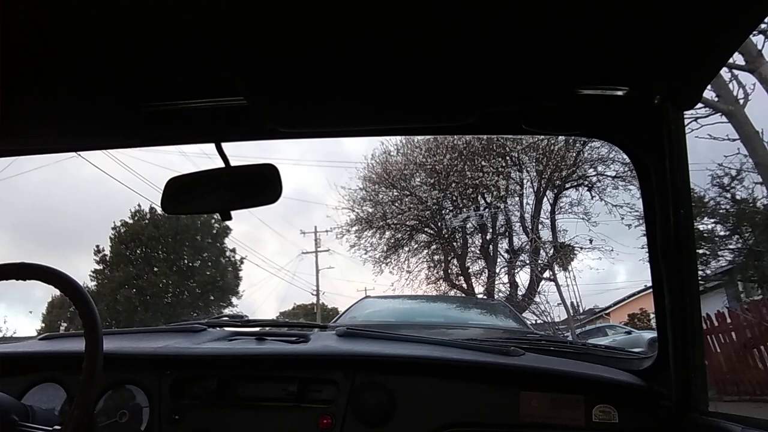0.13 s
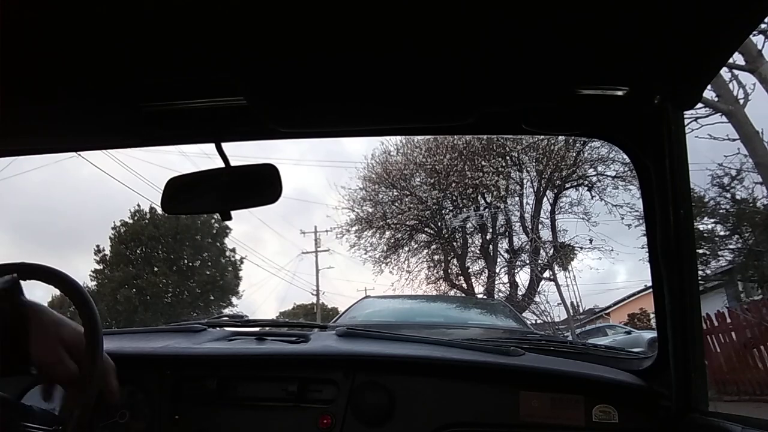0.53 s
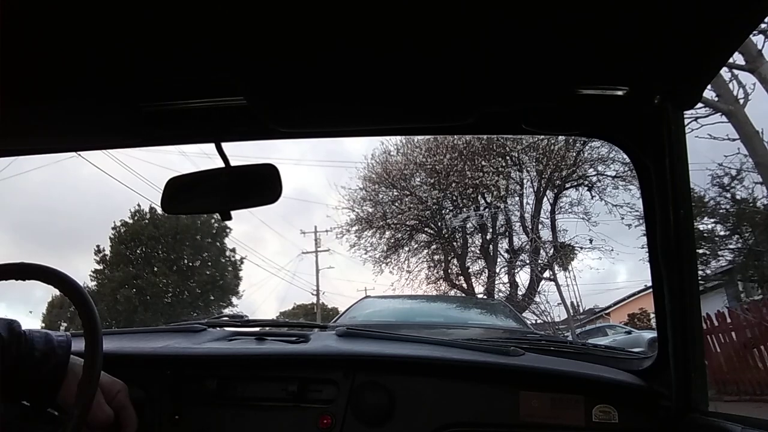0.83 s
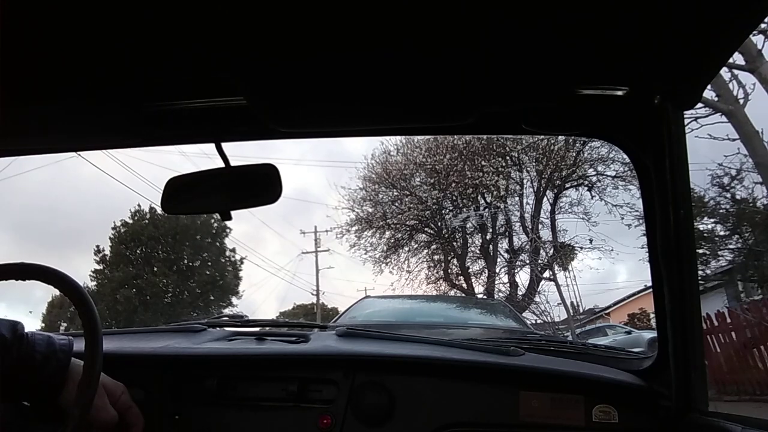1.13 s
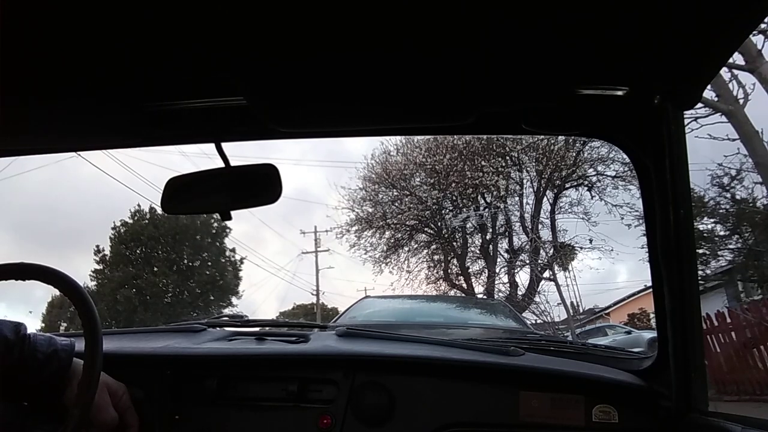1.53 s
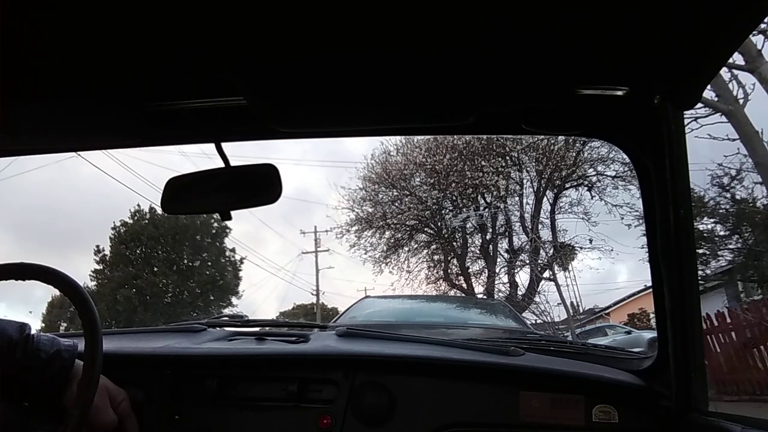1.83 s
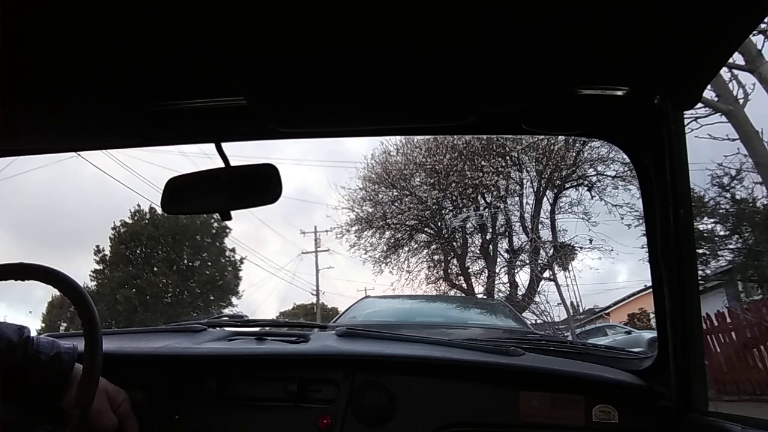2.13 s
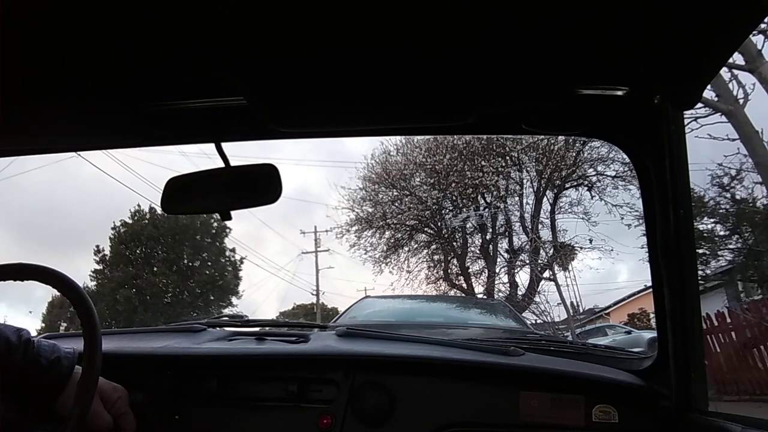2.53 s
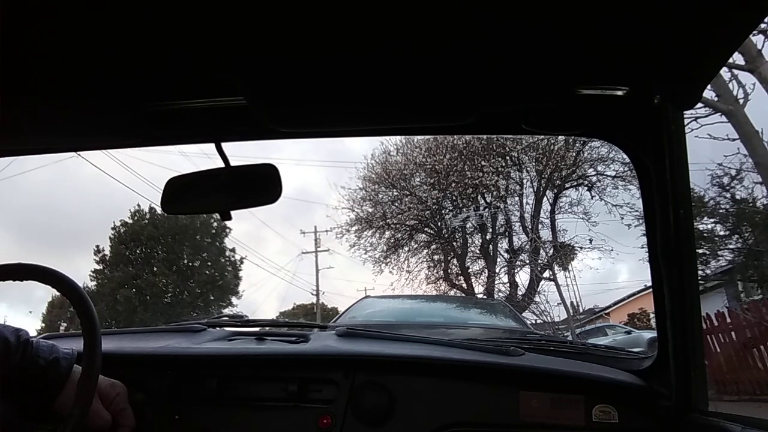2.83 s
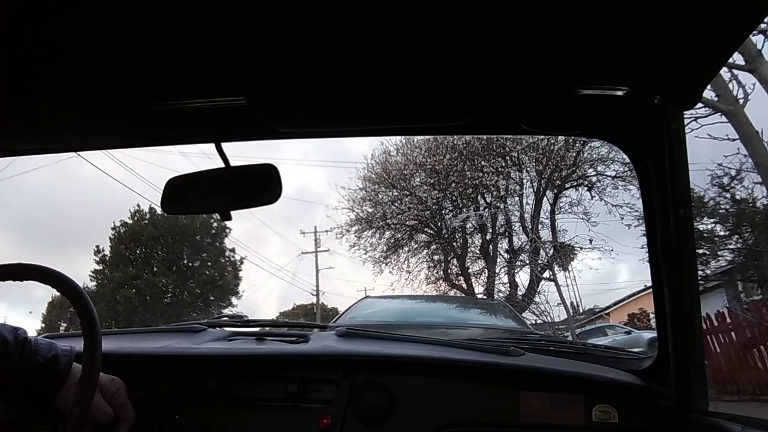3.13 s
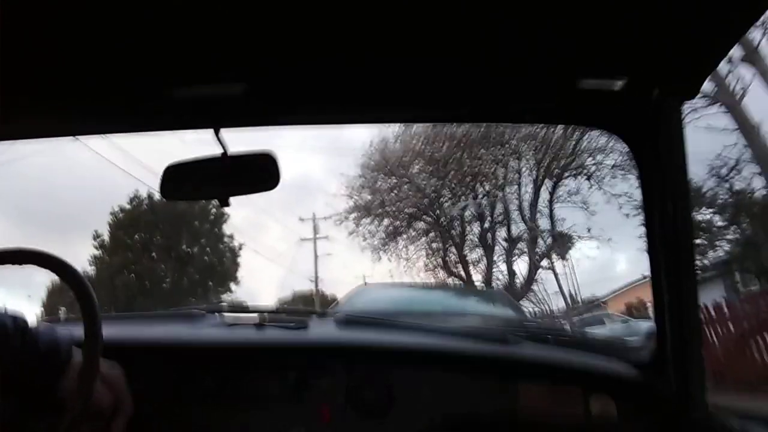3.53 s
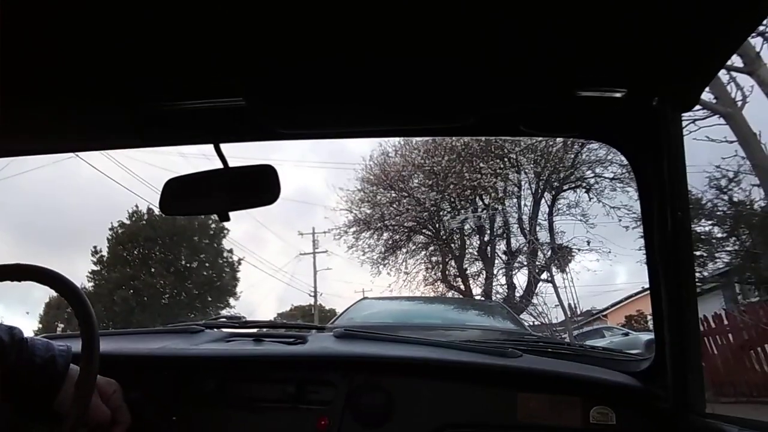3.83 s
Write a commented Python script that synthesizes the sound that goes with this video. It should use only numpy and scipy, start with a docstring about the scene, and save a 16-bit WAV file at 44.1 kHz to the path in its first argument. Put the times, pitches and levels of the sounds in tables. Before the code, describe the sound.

Starter and engine heard from within a small, dry cabin. Quiet hand rubbing and light metal clicks lead to a abrupt rough crank, then a softer muffled engine run with brighter key jingles near the microphone.

```python
"""Keys and engine start in a parked car

A hand fumbles with keys over a steady hush: noise rustles and crackles, noise bursts tick with a metal ring,
knocks on column and dash add a decaying sine. Then a starter grinds (uneven tooth pulses in housing
resonances), the engine catches and runs (firing pulses through the bulkhead) amid louder ticks and knocks,
and a struck key rings as decaying sines roughened by fast level flutter."""
import sys
import numpy as np
from scipy import signal
from scipy.fft import rfft, irfft
from scipy.io import wavfile
from scipy.ndimage import uniform_filter1d

SR = 44100
rng = np.random.default_rng(int(sys.argv[2]) if len(sys.argv) > 2 else 0)


def wrap_up_sound(samples):
    """Save the sound to the file named by the first command line argument, as 16-bit audio."""
    columns = np.atleast_2d(samples).T
    # keep every value between -1 and 1, then stretch to whole-number steps
    tamed = np.clip(columns, -1, 1)
    steps = np.round(tamed * 32767).astype(np.int16)
    wavfile.write(sys.argv[1], SR, steps)


N = 176400
T = np.arange(N) / SR


def undb(db):
    """dB to amplitude gain."""
    return 10 ** (np.asarray(db) / 20)


def unit(x):
    """Scale to rms 1."""
    return x / np.sqrt(np.mean(x ** 2))


def curve(table, column):
    """Gain over time, interpolated in dB from one column; -120 dB before the first row."""
    points = np.array(table)
    return undb(np.interp(T, points[:, 0], points[:, column], left=-120))


def colour(x, points):
    """Shape the spectrum by (f/Hz, gain/dB) points on a log axis, -60 dB outside them; rms 1."""
    table = np.array(points)
    f_hz = np.arange(len(x) // 2 + 1) * SR / len(x) + 1  # +1 avoids log(0)
    gain_db = np.interp(np.log(f_hz), np.log(table[:, 0]), table[:, 1], left=-60, right=-60)
    return unit(irfft(rfft(x) * undb(gain_db), len(x)))


def band(x, f_hz, width_hz):
    """Resonance with gain 1 at its centre."""
    b, a = signal.iirpeak(min(f_hz, .45 * SR), f_hz / width_hz, fs=SR)
    return signal.lfilter(b, a, x)


def cut(x, f_hz, kind, order=2):
    """Butterworth filter."""
    return signal.sosfilt(signal.butter(order, f_hz, kind, fs=SR, output="sos"), x)


def walk(rate_hz):
    """Random levels held for 1 / rate, smoothed twice; spread about 0.56."""
    hold = int(SR / rate_hz)
    steps = np.repeat(rng.standard_normal(N // hold + 1), hold)
    return 0.76 * uniform_filter1d(uniform_filter1d(steps, hold), hold)[:N]


def grit(scatter_db, rate_hz):
    """Noise whose level wanders like rubbing."""
    return rng.standard_normal(N) * undb(scatter_db * walk(rate_hz))


def pulses(rate_hz, jitter, scatter_db):
    """Pulse train with log-normal intervals (median 1 / rate) and scattered levels."""
    draws = rng.standard_normal((int(N / SR * 400), 2))
    at = (np.cumsum(np.exp(jitter * draws[:, 0])) / rate_hz * SR).astype(int)
    out = np.zeros(N)
    out[at[at < N]] = undb(scatter_db * draws[at < N, 1])
    return out


def add(out, start_s, x):
    """Mix x in at start_s."""
    i = int(start_s * SR)
    out[i:i + len(x)] += x[:N - i]


def shape(attack_s, t60_s, t, hold_s=0):
    """Envelope: exponential attack, hold, decay by 60 dB in t60 (at least 10 ms)."""
    decay_db = -60 * np.maximum(t - hold_s, 0) / max(t60_s, .01)
    return (1 - np.exp(-t / attack_s)) * undb(decay_db)


def hush():
    """Cabin hush: coloured noise with slight level wander."""
    # spectrum: f/Hz, relative gain/dB
    hush_spectrum = [(60, -32), (380, -10), (700, -8.5), (1300, -8), (2500, -25), (5000, -29.5),
                     (12500, -36.5), (15500, -88)]
    hush_db = -72
    return undb(hush_db) * colour(grit(0.28, 7.9), hush_spectrum)


def rustle():
    """Hand and sleeve rub: two noise bands, roughened by many tiny decaying clicks."""
    # base levels: t/s, low band/dB, high band/dB
    rustle_levels = [(.07, -84, -78), (.15, -65.5, -73.5), (.39, -61, -64.5), (.55, -65, -67.5),
                     (.75, -59, -68), (.88, -69, -77.5), (1.05, -60.5, -67), (1.25, -63, -75.5),
                     (1.35, -68.5, -77.5), (1.55, -71.5, -73.5), (1.65, -67.5, -72.5), (1.9, -68.5, -75.5),
                     (2.1, -67.5, -71), (2.3, -65.5, -82.5), (2.5, -70.5, -76), (2.7, -70, -80.5),
                     (2.85, -78.5, -92)]
    # low-band spectrum: f/Hz, relative gain/dB
    low_spectrum = [(100, -32), (290, -10.5), (900, -2), (1010, -1), (1190, -5.5), (2500, -13), (3300, -19)]
    # high-band spectrum: f/Hz, relative gain/dB
    high_spectrum = [(1180, -28), (2000, -5.5), (3290, -5), (4140, 1), (13500, -25), (15500, -43)]
    crackle_per_s, crackle_db, crackle_t60_s = 57, -8, 0.054

    rub = undb(1.5 * walk(24))
    clicks = np.abs(pulses(crackle_per_s, jitter=0.74, scatter_db=3))
    crackle = signal.fftconvolve(clicks, shape(0.00029, crackle_t60_s, T[:3000]))[:N]
    grain = 1 + undb(crackle_db) * unit(crackle)
    low = colour(grit(2.5, 90) * np.sqrt(grain), low_spectrum)
    high = colour(grit(3.4, 120) * grain, high_spectrum)
    both = curve(rustle_levels, column=1) * low + curve(rustle_levels, column=2) * high
    return rub * both * (T < rustle_levels[-1][0])


def ticks():
    """Keys and small metal parts touch: a short noise burst, bright or dull, with a metal ring at its pitch."""
    # contacts: t/s, relative level/dB, pitch f/Hz, top octave re low band/dB
    tick_events = [(0.6607, -52.5, 4800, -30), (0.7157, -52, 4200, 0), (0.741, -42, 9450, -3),
                   (0.76, -42.5, 9800, -15.5), (0.819, -44.5, 4770, -4), (0.8394, -46, 5540, -2),
                   (0.9727, -54.5, 12200, -6), (0.999, -50, 5170, -24), (1.176, -47, 14000, -7),
                   (1.2084, -42, 8600, -5), (1.232, -40, 4280, -4), (1.26, -41.5, 4500, -30),
                   (1.2885, -48, 5000, -15), (1.3777, -46, 5560, -5), (1.5361, -42, 3900, -19),
                   (1.555, -50, 4670, -32), (1.645, -49, 3960, -20), (1.7202, -48.5, 3960, -7),
                   (1.7492, -48, 3720, 0), (1.809, -49, 11600, 4), (1.8496, -43.5, 5850, -7),
                   (1.8897, -48, 6540, -20), (1.94, -48.5, 7780, -6), (2.02, -45, 6760, -2),
                   (2.0736, -45, 5470, 0), (2.097, -45.5, 11800, 3), (2.155, -46, 6360, -12),
                   (2.194, -50.5, 6000, -8), (2.285, -46, 4300, -38), (2.3193, -46, 4000, -23),
                   (2.4008, -45, 5150, -32), (2.687, -50, 4620, -23), (2.727, -58, 5170, -37),
                   (3.149, -39, 3650, -29), (3.3346, -40.5, 3580, -28), (3.412, -39.5, 6700, -25),
                   (3.492, -50, 4320, -29), (3.6136, -45, 4400, -32), (3.711, -37.5, 4080, -30),
                   (3.759, -31, 7670, -7), (3.809, -44.5, 6640, -19), (3.825, -40, 4730, -30),
                   (3.881, -43, 5100, 2), (3.9232, -35, 11900, 2), (3.984, -36, 6700, 1)]
    t60_s, hold_s, attack_s = 0.1, 0.0014, 0.0032
    ring_t60_s, ring_db = 0.047, -2
    hump_db, stray_db = -1.5, -3

    out, t = np.zeros(N), T[:6000]
    burst_env = shape(attack_s, t60_s, t, hold_s)
    ring_env = shape(attack_s, ring_t60_s, t)
    for start_s, level_db, pitch_hz, top_db in tick_events:
        noise = rng.standard_normal((4, len(t)))
        noise = noise * undb(1.35 * unit(cut(noise[3], 260, "low")))  # rattle: level flutters below 260 Hz
        low = unit(cut(noise[0], [2500, 8000], "band"))
        top = unit(cut(noise[1], [8500, 14000], "band", order=1))
        hump = unit(band(noise[2], pitch_hz, 0.075 * pitch_hz))
        burst = low + undb(hump_db) * hump + undb(top_db) * top
        # neighbouring keys ring at random pitches, 2.5-12.5 kHz
        stray = sum(unit(band(noise[0], f_hz, 90)) for f_hz in 2500 * 5 ** rng.random(4))
        main = unit(band(band(noise[2], pitch_hz, 83), pitch_hz, 360))
        ring = (main + undb(stray_db) * stray) * ring_env
        add(out, start_s, 0.15 * undb(level_db) * (burst * burst_env + undb(ring_db) * ring))
    return out


def snaps():
    """Dry single clicks: band-passed noise with a near-instant attack and 14 ms decay."""
    # clicks: t/s, relative level/dB
    snap_events = [(.925, -57), (1.082, -59), (1.176, -47), (1.749, -47), (2.5, -59), (2.56, -62),
                   (2.937, -66), (3.026, -64), (3.501, -34), (3.544, -41), (3.618, -47), (3.678, -48)]
    out, t = np.zeros(N), T[:6000]
    for start_s, level_db in snap_events:
        burst = 2 * rng.standard_normal(len(t)) * shape(.0001, .014, t)
        add(out, start_s, undb(level_db) * cut(burst, [1500, 5500], "band"))
    return out


def knocks():
    """Knocks on column and dash: a dull burst in the plastic, one resonance rings; soft contact rises slowly."""
    # blows: t/s, relative level/dB, pitch f/Hz, t60/s, rise/ms
    knock_events = [(0.693, -56, 240, 0.099, 2.7), (0.719, -50, 750, 0.028, 1), (0.783, -46, 855, 0.043, 2),
                    (0.827, -41.5, 972, 0.056, 6.4), (0.994, -50, 895, 0.088, 2),
                    (1.175, -46.5, 1745, 0.063, 0.55), (1.503, -54, 907, 0.25, 0.52),
                    (1.518, -43.5, 1352, 0.11, 6), (1.549, -46.5, 1544, 0.072, 4.5),
                    (1.591, -51.5, 893, 0.046, 5.3), (1.747, -43, 1955, 0.075, 0.49),
                    (2.23, -54, 1690, 0.12, 3.6), (2.319, -49, 887, 0.11, 2.3),
                    (2.403, -51, 915, 0.047, .6), (2.63, -54, 1000, 0.028, 0.85),
                    (2.721, -52, 1700, 0.08, 7), (3.118, -59.5, 857, 0.1, 3),
                    (3.147, -36.5, 1486, 0.055, 6), (3.178, -33.5, 1454, 0.12, 1.1),
                    (3.213, -33.5, 285, 0.094, 3), (3.274, -34.5, 387, 0.11, 5.5),
                    (3.472, -43, 961, 0.22, 1), (3.488, -33, 1448, 0.071, 10.7),
                    (3.722, -39, 979, 0.084, 4), (3.762, -43, 608, 0.19, 3.3)]
    width_per_pitch, ring_db = .1, 1

    out, t = np.zeros(N), T[:8000]
    for start_s, level_db, pitch_hz, t60_s, rise_ms in knock_events:
        noise = rng.standard_normal((2, len(t)))
        rise_s = max(rise_ms, .1) / 1000
        edges_hz = [max(0.31 * pitch_hz, 200), min(3 * pitch_hz, 3500)]
        body = unit(cut(noise[0], edges_hz, "band"))
        ring = unit(band(noise[1], pitch_hz, width_per_pitch * pitch_hz)) + np.sin(2 * np.pi * pitch_hz * t)
        envelope = shape(rise_s / 2, t60_s, t, rise_s) * np.minimum(t / rise_s, 1)
        add(out, start_s, 0.47 * undb(level_db) * (body + undb(ring_db) * ring) * envelope)
    return cut(out, 170, "high", order=3)


def key():
    """A struck key: each blow rings its modes, roughened by fast random level flutter below 150 Hz."""
    # modes: f/Hz, relative level/dB, t60/s
    key_modes = [(4140, -17, .09), (6729, -22, .3), (10805, -6, .07), (11920, -1, .09), (14275, -20, .15),
                 (15615, -7, .05)]
    # blows: t/s, level/dB, tilt re first mode/(dB/octave)
    key_blows = [(3.925, -39.5, 1), (3.943, -45, 3.5), (3.987, -32, -13)]
    flutter_db = 3

    out, t = np.zeros(N), T[:6000]
    for start_s, level_db, tilt_db in key_blows:
        for f_hz, mode_db, t60_s in key_modes:
            flutter = undb(flutter_db * unit(cut(rng.standard_normal(len(t)), 150, "low")))
            tone = np.sin(2 * np.pi * (f_hz * t + rng.random()))
            gain_db = level_db + mode_db + tilt_db * np.log2(f_hz / key_modes[0][0])
            add(out, start_s, undb(gain_db) * flutter * tone * shape(.003, t60_s, t, .013))
    return out


def resonate(x, modes):
    """Sum of resonances, each swelling and fading on its own."""
    swell_db = 3.5
    return sum(undb(level_db + swell_db * walk(30)) * unit(band(x, f_hz, width_hz))
               for f_hz, width_hz, level_db in modes)


def starter():
    """Gear teeth grind through the housing: uneven tooth pulses and noise excite its resonances."""
    # starter housing and bulkhead: f/Hz, width/Hz, relative level/dB
    housing_modes = [(282, 61, -7), (413, 43, -6), (572, 68, -5.5), (1014, 93, 9.5), (1453, 89, 6.5),
                     (2015, 18, -0.5), (2286, 56, -5.5), (2550, 52, -11)]
    teeth_hz = 169.1
    teeth = unit(pulses(teeth_hz, jitter=0.27, scatter_db=3.5)) + 1.05 * grit(0.7, 65)
    direct = unit(cut(teeth, [250, 2800], "band", order=4))
    return unit(resonate(teeth, housing_modes) + 1.2 * direct)


def engine():
    """Rough firings through the bulkhead: slightly uneven pulses and noise excite its resonances."""
    # running engine through bulkhead: f/Hz, width/Hz, relative level/dB
    block_modes = [(326, 144, 1), (667, 200, -0.5), (987, 220, 9.5), (1347, 25, -2.5), (2600, 250, -12)]
    firing_hz = 60.1
    fire = 0.39 * unit(pulses(firing_hz, jitter=0.1006, scatter_db=1.0)) + grit(1.7, 50)
    return unit(resonate(fire, block_modes))


def motor():
    """Starter gives way to engine at the catch; low, mid and hiss bands follow their own levels."""
    # band levels: t/s, low/dB, mid/dB, hiss/dB
    motor_levels = [(3.08, -101, -90, -72), (3.175, -52, -55, -59), (3.19, -36, -41, -62),
                    (3.235, -46, -43.5, -51.5), (3.255, -44.5, -44.5, -58.5), (3.29, -51.5, -42.5, -52.5),
                    (3.35, -41.5, -39, -53.5), (3.42, -42.5, -42.5, -53), (3.455, -52.5, -51.5, -65.5),
                    (3.505, -45, -43, -47.5), (3.535, -49, -48.5, -57.5), (3.68, -54, -52, -59),
                    (3.78, -51, -53, -60.5), (3.87, -52.5, -51.5, -60.5), (4, -52.5, -53.5, -58)]
    # hiss spectrum: f/Hz, relative gain/dB
    hiss_spectrum = [(1470, 0.5), (2500, -12), (3440, -15.5), (4270, -10.5), (5830, -14.5), (15500, -43.5)]
    catch_s, crossfade_s = 3.46, 0.026

    caught = np.clip((T - catch_s) / crossfade_s, 0, 1)
    x = (1 - caught) * starter() + caught * engine()
    low = unit(cut(cut(x, 619, "low", order=3), 160, "high"))
    mid = unit(cut(x, [700, 3300], "band", order=3))
    hiss = colour(grit(3.5, 60), hiss_spectrum)
    return sum(curve(motor_levels, column) * x_band for column, x_band in enumerate((low, mid, hiss), start=1))


def scene():
    """Everything in the cabin, mono."""
    return (hush() + rustle() + ticks() + snaps() + knocks() + key() + motor())[None]


def record(dry):
    """Pickup: thins the bass, fades in along a square law, cuts the top steeply."""
    low_cut_hz, top_hz = 130, 15900
    fade_start_s, fade_len_s = 0.057, 0.022
    fade = np.clip((T - fade_start_s) / fade_len_s, 0, 1) ** 2
    x = cut(dry, low_cut_hz, "high", order=1) * fade
    return signal.sosfilt(signal.ellip(8, .2, 70, top_hz, fs=SR, output="sos"), x)


dry = scene()
out = record(dry)
wrap_up_sound(out)
```